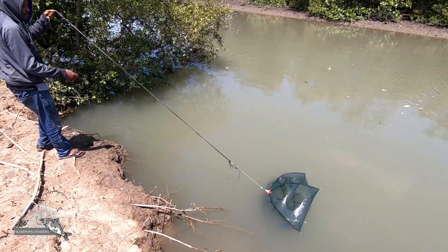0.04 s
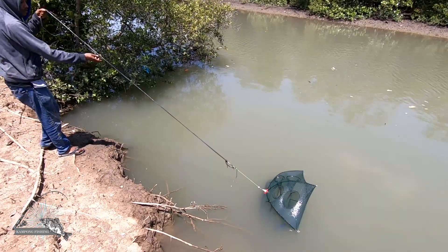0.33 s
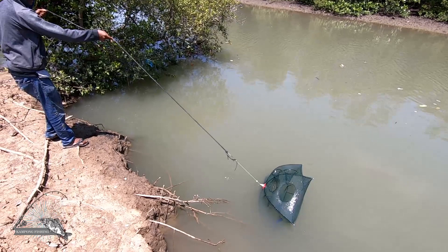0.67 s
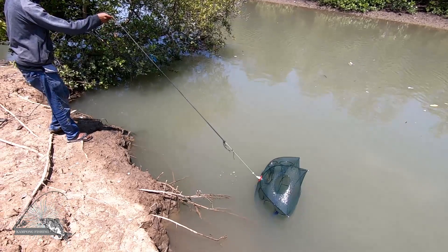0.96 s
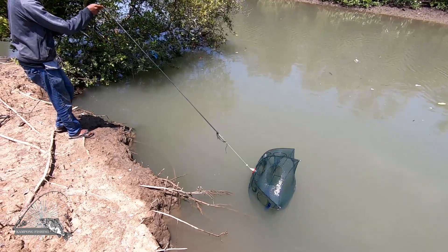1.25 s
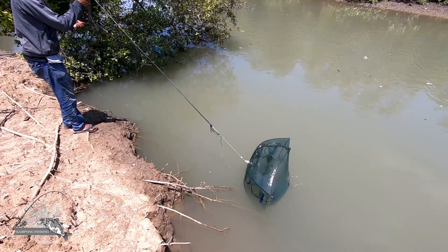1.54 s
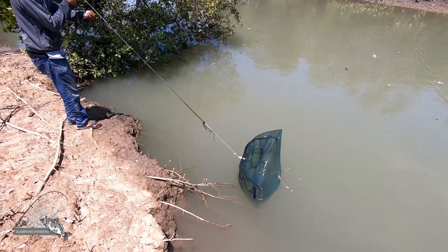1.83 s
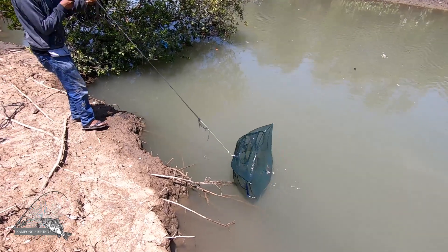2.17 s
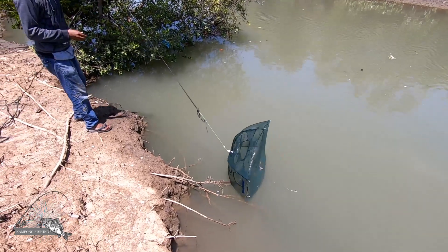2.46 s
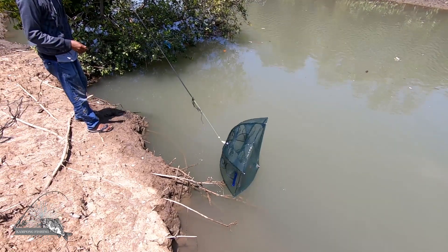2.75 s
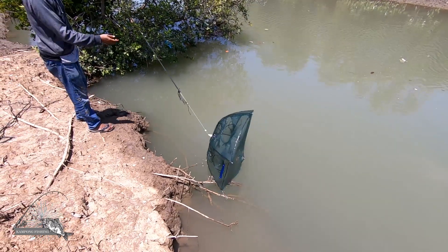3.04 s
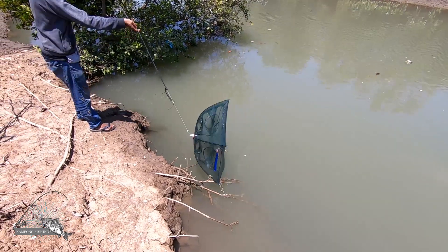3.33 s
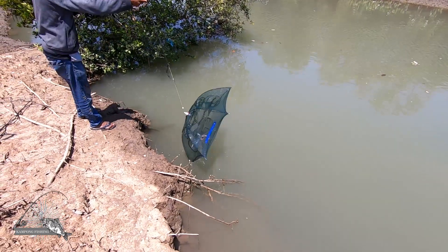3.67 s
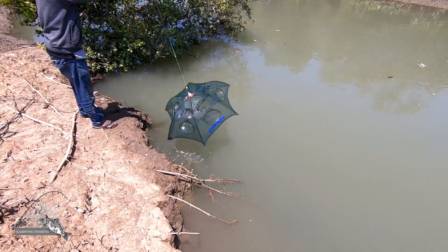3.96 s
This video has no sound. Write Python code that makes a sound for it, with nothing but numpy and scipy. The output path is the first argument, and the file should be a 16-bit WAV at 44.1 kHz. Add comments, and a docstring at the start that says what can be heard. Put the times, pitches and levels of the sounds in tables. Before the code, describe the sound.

A wet net trap ticks and drips as a rustling rope pulls it up, after a few shoe scuffs on the bank, then briefly spatters and drains. Low wind thumps hit the close microphone, with distant crickets and birds.

```python
"""A mesh crab trap is hauled by its rope out of a muddy creek, close to the microphone.
Rope and sleeves rustle with friction and shoes scuff the dry bank. The taut net ticks, and water
drips and gurgles from it, ringing as small bubbles. Wind buffets both microphone ports with eddies.
Farther off, over a wash of leaves and water, crickets trill in turns with their wings
and small birds whistle in the bushes."""
import sys
import numpy as np
from scipy import signal
from scipy.fft import rfft, irfft, next_fast_len
from scipy.io import wavfile

SR = 44100
rng = np.random.default_rng(int(sys.argv[2]) if len(sys.argv) > 2 else 0)


def persist_wave(psi):
    """Save psi, clipped to +-1, as 16-bit WAV."""
    counts = np.round(np.clip(psi, -1, 1) * 32767).astype(np.int16)
    wavfile.write(sys.argv[1], SR, np.atleast_2d(counts).T)


N = 176400
TIME, FREQS = np.arange(N) / SR, np.fft.rfftfreq(N, 1 / SR)


def amp(db):
    """Decibels to gain."""
    return 10 ** (np.asarray(db) / 20)


def unit(x):
    """Scales to rms 1."""
    return x / np.sqrt(np.mean(x ** 2) + 1e-20)


def add(mix, start, sound):
    """Mixes a sound in at a start time in seconds."""
    part = mix[..., max(round(start * SR), 0):][..., :sound.shape[-1]]
    part += sound[..., :part.shape[-1]]


def colour(x, spectrum, tilt_db=0):
    """Filters by a spectrum of (Hz, dB) points, tilted per octave, and scales to rms 1."""
    size = next_fast_len(x.shape[-1])
    octave = np.log2(np.fft.rfftfreq(size, 1 / SR) + 1)
    hz, db = np.transpose(spectrum)
    gain = amp(np.interp(octave, np.log2(hz), db) + tilt_db * np.maximum(octave, np.log2(hz[0])))
    return unit(irfft(rfft(x, size) * gain, size)[..., :x.shape[-1]])


def wander(rate, size=N):
    """A random curve of rms about 1, through `rate` new points a second."""
    points = rng.standard_normal(N // 4)
    return np.interp(np.arange(size) / SR * rate, np.arange(N // 4), points) * np.sqrt(3 / 2)


def noise_pair(alike, size=N):
    """Left and right white noise with correlation `alike`."""
    left, other = rng.standard_normal((2, size))
    return np.array([left, alike * left + np.sqrt(1 - alike ** 2) * other])


def pan(x, left_db):
    """Leans a sound to the left, or to the right if left_db is negative."""
    return x * amp([[left_db / 2], [-left_db / 2]])


def echoes(x, t60):
    """Diffuse scatter, different on each side, that falls 60 dB in t60 seconds."""
    t = TIME[:SR // 2]
    tail = rng.standard_normal((2, len(t))) * amp(-60 * t / t60) * (t > .002)
    return signal.fftconvolve(np.atleast_2d(x), tail / np.linalg.norm(tail[0]), axes=1)[:, :N]


# Wind right on the microphone. Each row: time in seconds, left and right relative level in dB.
WIND_LEVELS = [(0, -32.5, -23), (0.058, -33.5, -45.5), (.21, -32, -22.5), (.32, -40, -31.5),
               (.43, -51.5, -29.5), (0.488, -41, -40.5), (.63, -51, -46), (.76, -50.5, -40),
               (.93, -41, -41.5), (1.029, -52, -37), (1.178, -35.5, -27.5), (1.309, -47.5, -38.5),
               (1.7, -48.5, -37), (2.12, -44, -41), (2.289, -53, -39), (2.438, -36.5, -34.5),
               (2.719, -54, -52.5), (3.02, -53.5, -50), (3.22, -48.5, -45.5), (3.42, -58, -54),
               (3.72, -51.5, -47.5), (3.87, -60, -57), (4, -48, -33)]
# Light wind and gusts at the ports. Each row: frequency in Hz, relative level in dB.
BREEZE_SPECTRUM = [(10, -18), (30, -4.5), (65, 2.5), (120, -8), (200, -13.5), (300, -33.5), (500, -52.5),
                   (1000, -71.5), (3000, -100)]
GUST_SPECTRUM = [(10, 3), (30, 4), (65, -14), (120, 1), (200, -7), (300, -17), (500, -30), (1000, -64),
                 (3000, -89)]
# Eddies striking the ports. Each row: time in seconds, left and right level in dB, centre in Hz.
EDDIES = [(0.067, -15.5, -28.5, 85), (0.14, -41, -23, 196), (0.171, -18, -19, 99),
          (0.211, -19.5, -15.5, 126), (0.249, -46, -12.5, 203), (0.386, -53, -15, 121),
          (0.83, -50, -31.5, 147), (0.948, -21.5, -50, 75), (1.073, -59, -19, 76), (1.15, -38.5, -17, 179),
          (1.16, -31, -13.5, 154), (1.240, -46, -16, 115), (1.416, -53, -21.5, 117), (1.484, -57, -23, 133),
          (1.621, -41, -21, 111), (1.671, -42, -18, 85), (1.767, -43, -18, 111), (1.88, -52, -26, 125),
          (1.979, -45, -24.5, 101), (2.194, -28, -22.5, 70.5), (2.369, -49, -13, 124.5),
          (2.4, -40, -27, 168), (2.499, -47, -19, 76), (2.598, -53, -24, 79.6), (2.857, -56, -22.5, 93),
          (3.196, -52, -31, 111), (3.512, -48, -29.5, 93), (3.698, -88, -21.5, 92),
          (3.991, -44, -26.5, 118)]
# Wind reaching the other channel inverted. Each row: frequency in Hz, share that crosses.
WIND_BLEED = [(60, 0.022), (200, 0.13), (400, 0.25), (800, 0.11)]

def wind():
    """Lumpy turbulence at each port, brighter when stronger, with single eddies thumping through."""
    times, *levels = np.transpose(WIND_LEVELS)
    out = np.zeros((2, N))
    for port, level in zip(out, levels):
        db, noise = np.interp(TIME, times, level), rng.standard_normal(N)
        force = np.clip((db + 37) / 22, 0, 1)
        rumble = (1 - force) * colour(noise, BREEZE_SPECTRUM) + force * colour(noise, GUST_SPECTRUM)
        lumps_db = 3.8 * wander(rate=60)
        port += amp(db + 1.5 + lumps_db) * rumble
    t = TIME[:SR // 10] - .05
    for time, left_db, right_db, hz in EDDIES:
        phase = rng.uniform(-1.18, 1, (2, 1))
        eddy = ((1 - 2.2j * hz * t) ** -3 * np.exp(1j * phase)).real  # one brief swing of pressure
        add(out, time + t[0], amp([[left_db], [right_db]]) * eddy)
    bleed = np.interp(FREQS, *np.transpose(WIND_BLEED))
    return out - irfft(rfft(out[::-1]) * bleed, N)


# The distant creekside, as mid and side. Each row: frequency in Hz, relative level in dB.
WASH_MID_SPECTRUM = [(30, -1), (250, 13), (500, -4.5), (800, 2.5), (1200, -5.5), (2000, -10.5), (3600, -8),
                     (6000, -17.5), (8800, -12.5), (10500, -38), (12000, -25.5), (15500, -41)]
WASH_SIDE_SPECTRUM = [(30, -0.5), (250, 3), (500, 0.5), (800, 9.5), (1200, 0.5), (2000, -7), (3600, -18),
                      (6000, -16), (8800, -11), (10500, -28), (12000, -34), (15500, -41)]

def far_wash():
    """Leaves and water blur into a wide, gently swelling noise."""
    mid, side = rng.standard_normal((2, N))
    mid = amp(-71) * colour(mid, WASH_MID_SPECTRUM)
    side = amp(-69) * colour(side, WASH_SIDE_SPECTRUM)
    swell = amp(1.4 * wander(rate=10))
    return pan(swell * np.array([mid + side, mid - side]), left_db=-0.4)


# Single crickets off to the right. Each row: start and length in seconds, pitch in Hz,
# relative level in dB, sag over one stroke in Hz.
CRICKET_TRILLS = [(0, .39, 7775, -72, 80), (.65, .43, 7775, -67, 80), (1.33, .42, 7775, -69, 80),
                  (2.0, .44, 7775, -69, 80), (2.7, .48, 7775, -68, 80), (3.48, .41, 7775, -66, 80),
                  (.39, .57, 6930, -74, 150), (1.25, .55, 6930, -76, 150), (2.12, .59, 6930, -72, 150),
                  (3.02, .52, 6930, -68, 220), (3.91, .09, 6930, -69, 220), (.13, .57, 7250, -75, 120),
                  (1.02, .5, 7250, -74, 120), (1.82, .45, 7250, -76, 120), (2.54, .5, 7250, -73, 120),
                  (3.22, .45, 7250, -75, 120), (.48, .55, 7580, -74, 80), (1.34, .6, 7580, -73, 80),
                  (.85, .38, 7475, -66, 40), (1.58, .47, 7485, -68, 40), (2.43, .27, 7495, -64, 40)]
# The chorus behind them. Each row: frequency in Hz, relative level in dB.
CHORUS_SPECTRUM = [(100, -71.5), (6200, -23), (7000, -14), (7350, 1), (7600, 2.5), (7900, -8.5),
                   (8600, -25.5), (10000, -55)]
NOMINAL_STROKES_PER_S, CRICKET_DRIFT_HZ, LEFT_LAG_S = 31, 25, .000054

def crickets():
    """Trills of short wing strokes, each sagging in pitch, over a blurred chorus."""
    trills = np.zeros(N)
    for start, length, hz, db, sag_hz in CRICKET_TRILLS:
        t = np.arange(0, length, 1 / SR)
        stroke_rate = NOMINAL_STROKES_PER_S * rng.uniform(0.84, 1.5)
        stroke = (t * stroke_rate + 0.024 * wander(rate=3.6, size=len(t))) % 1
        pitch = hz - sag_hz * (stroke - .5) + CRICKET_DRIFT_HZ * wander(rate=120, size=len(t))
        pulses = np.sin(np.pi * stroke) ** 2
        fade = np.clip(np.minimum(t, length - t) / 0.045, 0, 1)
        roughness = 1 + 0.22 * wander(rate=180, size=len(t))
        tone = np.sin(2 * np.pi * np.cumsum(pitch) / SR)
        add(trills, start, amp(db) * unit(pulses * fade * roughness * tone))
    shimmer = amp(-73 + 2 * wander(rate=130) + wander(rate=3.6))
    chorus = shimmer * colour(noise_pair(alike=0.24), CHORUS_SPECTRUM)
    spectra = rfft(amp(-2.5) * trills + amp(-9) * echoes(trills, t60=0.15) + chorus)
    spectra[0] *= np.exp(-2j * np.pi * FREQS * LEFT_LAG_S)  # the sound reaches the left port later
    return pan(irfft(spectra, N), left_db=-5.0)


# Rope and sleeves, close and centred. Each row: time in seconds, level in dB.
RUSTLE_LEVELS = [(0, -83), (.18, -70.5), (.36, -71), (.55, -90.5), (.9, -83), (1.15, -76), (1.5, -83),
                 (1.8, -88), (2.02, -72.5), (2.2, -79.5), (2.35, -66.5), (2.55, -78.5), (2.9, -86),
                 (3, -67), (3.27, -75), (3.55, -70.5), (3.72, -72), (3.8, -62), (3.86, -68), (4, -61)]
# The rustle as heard. Each row: frequency in Hz, relative level in dB.
RUSTLE_SPECTRUM = [(100, -14), (600, -3), (1500, 2.5), (3000, 0.5), (5000, 0), (8000, -7.5), (10000, -9.5),
                   (12000, -28), (16000, -34)]
CRACKLES_PER_S = 240

def rope_rustle():
    """Fine friction grains and crackling fibres swell with each pull of the rope."""
    grains = noise_pair(alike=0.5) * amp(4.5 * wander(rate=1800) + 2.0 * wander(rate=170))
    impulses = rng.random(N) < CRACKLES_PER_S / SR
    crackle = impulses * amp(2 * np.minimum(rng.exponential(1, N), 2))
    fibres = unit(grains) + amp(-10.5) * unit(crackle)
    return amp(np.interp(TIME, *np.transpose(RUSTLE_LEVELS))) * colour(fibres, RUSTLE_SPECTRUM)


# A sleeve near the microphone as the arm reaches out. Each row: time in seconds, level in dB.
SWISH_LEVELS = [(.04, -86), (.17, -75), (.31, -75.5), (.6, -93)]
# Its hiss. Each row: frequency in Hz, relative level in dB.
SLEEVE_SPECTRUM = [(100, -50), (6500, -11), (8500, 4.5), (10300, -2), (12000, -34)]

def sleeve_swish():
    """Cloth slides over cloth with a high hiss."""
    swell = amp(np.interp(TIME, *np.transpose(SWISH_LEVELS), right=-np.inf))
    return swell * colour(noise_pair(alike=0.35), SLEEVE_SPECTRUM)


# Birds in the far bushes, well to the right. Each row: start and length in seconds, first, middle
# and last pitch in Hz, relative level in dB, waver as a share of the pitch.
BIRD_WHISTLES = [(0.053, 0.36, 4030, 4070, 4170, -79.5, 0.037),
                 (0.299, 0.16, 3920, 3780, 3670, -85, 0.0163), (0.454, 0.17, 6900, 5850, 5640, -83, .026),
                 (1.12, 0.31, 4540, 4730, 4780, -82, .028), (1.33, 0.24, 4650, 4560, 4550, -83, .01),
                 (1.727, 0.19, 5050, 5030, 4880, -84, .02), (1.88, 0.29, 4750, 4865, 5060, -78.5, .01),
                 (2.076, .13, 6900, 6150, 5620, -80, 0.029), (2.25, 0.52, 3400, 3683, 3600, -84.5, 0.014),
                 (2.868, 0.4, 5130, 5320, 5270, -80.5, 0.011), (3.285, 0.044, 4430, 4490, 4460, -67, 0.005),
                 (3.382, 0.062, 4000, 4170, 4140, -69, .005), (3.663, 0.15, 2450, 2320, 2300, -72, 0.0042)]

def birds():
    """Thin wavering whistles, smeared by the bushes."""
    out = np.zeros(N)
    for start, length, first, middle, last, db, waver in BIRD_WHISTLES:
        progress = np.linspace(0, 1, round(length * SR))
        glide = np.polyval(np.polyfit([0, .5, 1], [first, middle, last], 2), progress)
        pitch = glide * (1 + waver * wander(rate=400, size=len(progress)))
        swell = np.sqrt(abs(np.sin(np.pi * progress)))
        flutter = amp(wander(rate=50, size=len(progress)))
        tone = np.sin(2 * np.pi * np.cumsum(pitch) / SR)
        add(out, start, amp(db) * unit(swell * flutter * tone))
    return pan(amp(-4.5) * (out + 1.04 * echoes(out, t60=0.11)), left_db=-10.5)


BURST_RISE_S, BURST_FALL_DB, DULL_DB_PER_OCTAVE = 0.0022, 25, 17.5

def grain_bursts(rows, spectrum):
    """Clumps of grains that start fast and die away; soft contacts lose their treble."""
    out, t = np.zeros((2, N)), TIME[:SR // 6]
    hz = np.geomspace(100, 16000, 60)
    knots, levels = np.transpose(spectrum)
    body_db = np.interp(np.log(hz), np.log(knots), levels)
    for start, length, db, tilt_db, top_hz in rows:
        dulled_db = body_db - DULL_DB_PER_OCTAVE * np.maximum(np.log2(hz / top_hz), 0)
        envelope = np.minimum(t / BURST_RISE_S, 1) * amp(-BURST_FALL_DB * (t / length) ** 2)
        grit = noise_pair(alike=0.86, size=len(t)) * amp(2 * wander(rate=700, size=len(t)))
        add(out, start, amp(db) * envelope * colour(grit, np.transpose([hz, dulled_db]), tilt_db))
    return out


# Soles on the bank, close by. Each row: start and length in seconds, level in dB,
# tilt in dB per octave, frequency in Hz above which the scuff dulls.
SHOE_SCUFFS = [(.276, 0.025, -59, 0, 6000), (.291, 0.031, -47.5, -5.5, 3830),
               (.304, .04, -54.5, -3.5, 4000), (.387, .018, -58, -4, 5040), (.664, 0.049, -51, -4.5, 1470),
               (.682, 0.028, -57.5, 1.5, 2280), (.702, 0.048, -49, -5.5, 4500),
               (.716, .02, -48, -4.5, 2780), (.727, .01, -44.5, -6, 950), (.741, 0.035, -50, -7, 2100),
               (.758, 0.031, -58, -2.5, 4500), (.774, 0.037, -56, -4, 5300)]
# Crumbs and twigs underfoot. Each row: start in seconds, peak in dB, tilt in dB per octave.
TWIG_SNAPS = [(0.2825, -35, 0.5), (0.2946, -33.5, 2), (0.7055, -46, 7.5), (0.7147, -32, -4.5)]
# Scuffs and snaps on dry mud, heard with the treble cut off above about 10 kHz.
# Each row: frequency in Hz, relative level in dB.
FOOTWORK_SPECTRUM = [(100, -9.5), (400, -13.5), (800, -4.5), (1100, -9), (1700, -1.5), (2600, -4.5),
                     (4000, -4.5), (6500, -11), (9500, -13), (12000, -35.5), (16000, -57)]
SNAP_DECAY_S = 0.00092

def footwork():
    """Shoes grind over dry mud and snap crumbs and twigs."""
    out = grain_bursts(SHOE_SCUFFS, FOOTWORK_SPECTRUM)
    t = TIME[:SR // 40] - .005
    envelope = np.exp(-abs(t) / SNAP_DECAY_S) * (t >= 0)
    for start, db, tilt_db in TWIG_SNAPS:
        snap = colour(noise_pair(alike=0.83, size=len(t)) * envelope, FOOTWORK_SPECTRUM, tilt_db)
        add(out, start + t[0], amp(db) * snap / abs(snap).max())
    return pan(out, left_db=-1.5)


# Drops under the net, near and a little to the right. Each row: start in seconds,
# bubble pitch in Hz, relative level in dB, decay time in seconds.
NET_DRIPS = [(1.102, 3180, -50.5, 0.0021), (1.371, 2360, -70.5, 0.027), (1.869, 1257, -68.5, 0.019),
             (2.582, 4700, -49, 0.0012), (3.1198, 8700, -50, 0.0023), (3.140, 1850, -58, 0.0077),
             (3.195, 2650, -53, 0.0059), (3.334, 9570, -54, 0.0013), (3.394, 2780, -54, 0.0042),
             (3.475, 2230, -66, 0.01), (3.558, 8770, -52, 0.0017), (3.595, 915, -57.5, 0.0057),
             (3.679, 5640, -49, 0.0019), (3.789, 847, -45, 0.0076), (3.892, 2250, -46, 0.0038),
             (3.898, 1965, -42, 0.0034), (3.902, 1690, -51, 0.0017), (3.910, 2600, -45, 0.0016),
             (3.916, 1370, -59, 0.0043), (3.918, 2600, -39, 0.0014), (3.927, 1750, -43.5, .002),
             (3.947, 1570, -60, 0.0036), (3.957, 1620, -45, .004), (3.983, 4120, -53, 0.0027)]
# A drop radiates little bass. Each row: frequency in Hz, gain in dB.
DROP_RADIATION = [(560, -30), (790, 0), (10000, 0), (14000, -8)]
BUBBLE_RISE_PER_S, BUBBLE_WOBBLE = 2, 0.046  # as shares of the pitch
DRIP_ATTACK_S, SPLAT_DECAY_S = 0.0005, 0.0028

def drips():
    """Each drop splats and rings a small wobbling bubble that rises in pitch."""
    out, t = np.zeros(N), TIME[:SR // 12]
    attack = 1 - np.exp(-(t / DRIP_ATTACK_S) ** 2)
    for start, hz, db, decay in NET_DRIPS:
        pitch = hz * (1 + BUBBLE_RISE_PER_S * t + BUBBLE_WOBBLE * wander(rate=760, size=len(t)))
        bubble = np.sin(2 * np.pi * np.cumsum(pitch) / SR) * np.exp(-t / decay)
        splat_spectrum = [(hz / 2, -25), (hz, 0), (hz * 1.8, -10), (hz * 3, -40)]
        splat = colour(rng.standard_normal(len(t)), splat_spectrum) * np.exp(-t / SPLAT_DECAY_S)
        add(out, start, amp(db + 0.5) * (bubble + amp(-12.5) * splat) * attack)
    radiation = amp(np.interp(FREQS, *np.transpose(DROP_RADIATION)))
    return pan(irfft(rfft(out) * radiation, N), left_db=-3.0)


# The net, near and just left of centre. Each row: start in seconds, peak in dB, centre in Hz.
NET_TICKS = [(1.955, -57, 3550), (2.015, -48, 4600), (2.318, -53.5, 3700), (2.582, -45.5, 4800),
             (2.722, -57, 3370), (2.793, -59, 2530), (2.959, -56, 4770), (2.986, -57, 3830),
             (3.0226, -49.5, 3440), (3.1906, -42.5, 4540), (3.344, -52, 5000), (3.395, -60, 3000),
             (3.793, -48, 2940), (3.8231, -41, 2150), (3.894, -47, 2700), (3.93, -40.5, 4270),
             (3.959, -33.5, 3240)]
# The colour of one tick. Each row: multiple of its centre frequency, relative level in dB.
TICK_SPECTRUM = [(.08, -28), (.3, -12), (1, 4), (1.6, 6), (2.2, -15), (3.6, -27)]
TICK_DECAY_S = 0.0014

def net_ticks():
    """Taut wet mesh and rope give short toneless ticks, and drops slap the net."""
    out, t = np.zeros((2, N)), TIME[:SR // 40] - .005
    envelope = np.exp(-abs(t) / TICK_DECAY_S) * (t >= 0)
    for start, db, hz in NET_TICKS:
        spectrum = [(hz * multiple, level) for multiple, level in TICK_SPECTRUM]
        tick = colour(noise_pair(alike=0.94, size=len(t)) * envelope, spectrum)
        add(out, start + t[0], amp(db) * tick / abs(tick).max())
    return pan(out, left_db=1.5)


# Water running out of the mesh, close and centred. Each row: time in seconds, level in dB.
GURGLE_LEVELS = [(3.886, -67), (3.895, -63), (3.905, -54), (3.93, -55), (3.94, -67), (3.96, -64), (4, -90)]
# Spatters from the net. Each row: start and length in seconds, level in dB,
# tilt in dB per octave, frequency in Hz above which the spatter dulls.
NET_SPATTERS = [(3.812, 0.029, -57, 4.5, 9100), (3.892, 0.019, -54, 2, 6000), (3.923, 0.042, -55, 6, 10500)]
# Their spray as heard. Each row: frequency in Hz, relative level in dB.
SPRAY_SPECTRUM = [(100, -30), (900, -38), (1700, 11), (3000, 1), (5800, -7), (7000, -17), (10300, -14),
                  (12000, -51), (16000, -45)]
GURGLE_HZ, GURGLE_SPREAD_OCTAVES = 2140, 0.72
BUBBLES_PER_S, BUBBLE_SIZES, BUBBLE_DECAY_CYCLES = 650, 16, 34

def draining():
    """Water leaves the rising net in a cloud of short bubbles and spatters."""
    cloud, t = np.zeros(N), TIME[:SR // 30]
    for hz in GURGLE_HZ * 2 ** (GURGLE_SPREAD_OCTAVES * np.linspace(-1, 1, BUBBLE_SIZES)):
        chirp = np.sin(2 * np.pi * hz * t * (1 + BUBBLE_RISE_PER_S * t / 2))
        envelope = np.exp(-t * hz / BUBBLE_DECAY_CYCLES) * np.minimum(t / 0.0013, 1)
        births = rng.random(N) < BUBBLES_PER_S / BUBBLE_SIZES / SR
        strengths = rng.uniform(.3, 1, N)
        cloud += signal.oaconvolve(births * strengths, chirp * envelope)[:N]
    flow = amp(np.interp(TIME, *np.transpose(GURGLE_LEVELS), left=-np.inf))
    return flow * unit(cloud) + grain_bursts(NET_SPATTERS, SPRAY_SPECTRUM)


def scene():
    """From the creek's edge: shoes, net and water echo off the bank, amid wildlife and wind."""
    near = footwork() + net_ticks() + drips() + draining()
    bank = amp(-12) * echoes(near, t60=0.1)
    return near + bank + rope_rustle() + sleeve_swish() + crickets() + birds() + far_wash() + wind()


BAND_LIMIT_HZ = 15300

def record(dry):
    """The stereo microphone hears less top treble on the left, more on the right, up to a band limit."""
    shade_db = np.interp(FREQS, [6000, 11000], [0, 3.5])
    heard = irfft(rfft(dry) * amp([-shade_db, shade_db / 2]), N)
    lowpass = signal.firwin(511, BAND_LIMIT_HZ, window=("kaiser", 9), fs=SR)
    return signal.oaconvolve(heard, lowpass[None], "same")


dry = scene()
out = record(dry)
persist_wave(out)
```